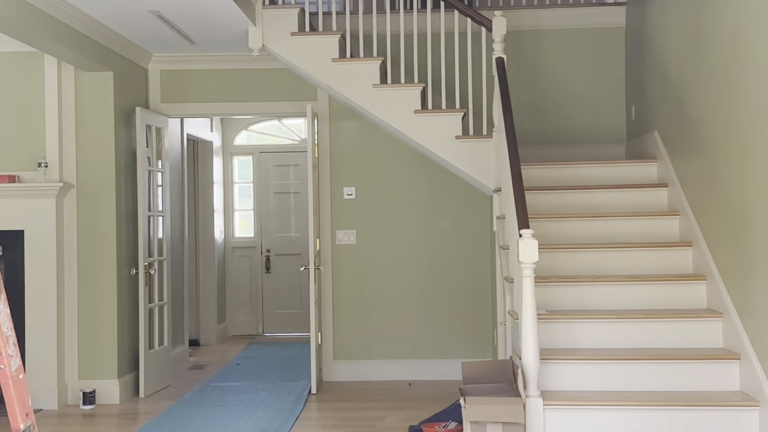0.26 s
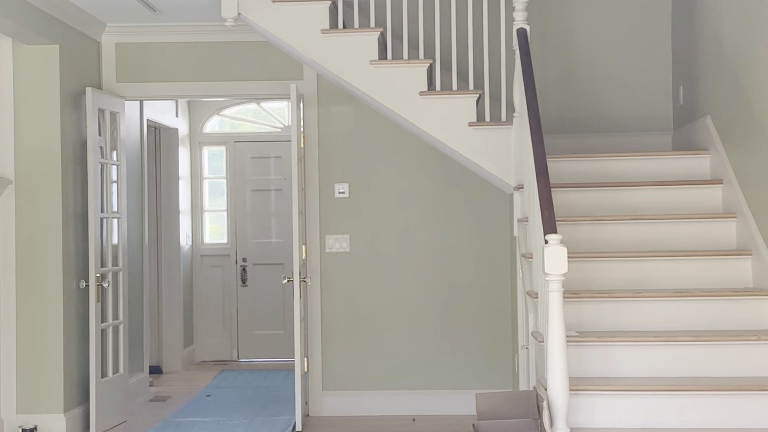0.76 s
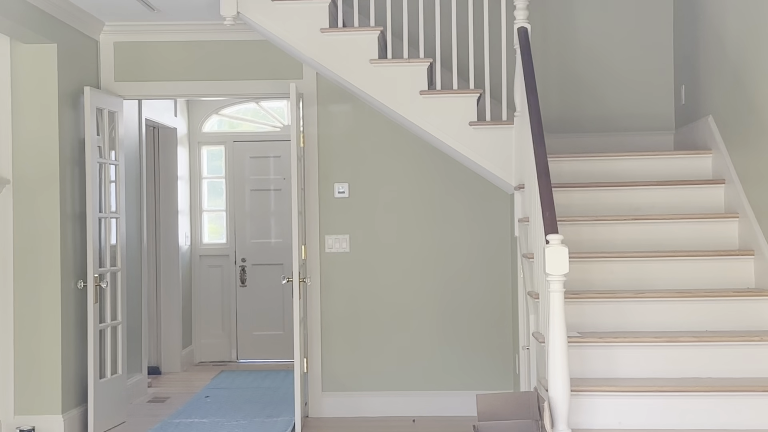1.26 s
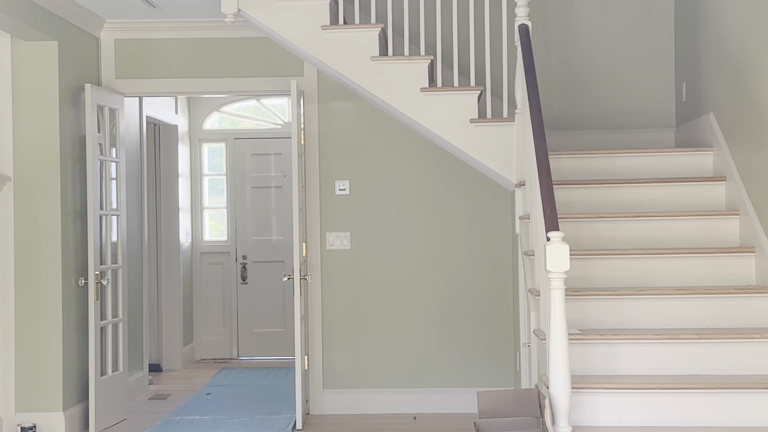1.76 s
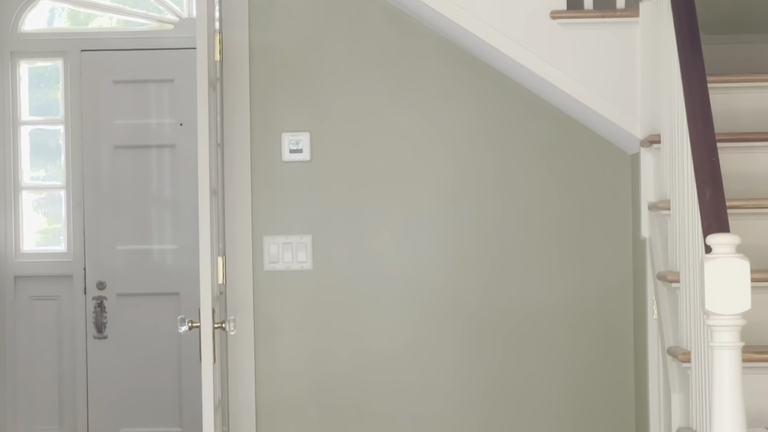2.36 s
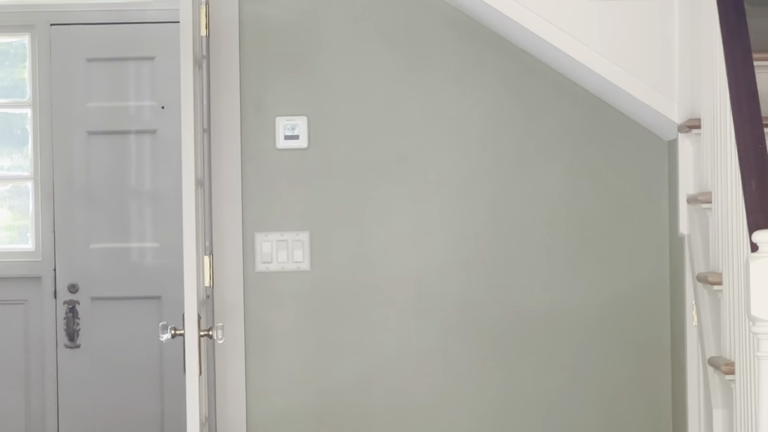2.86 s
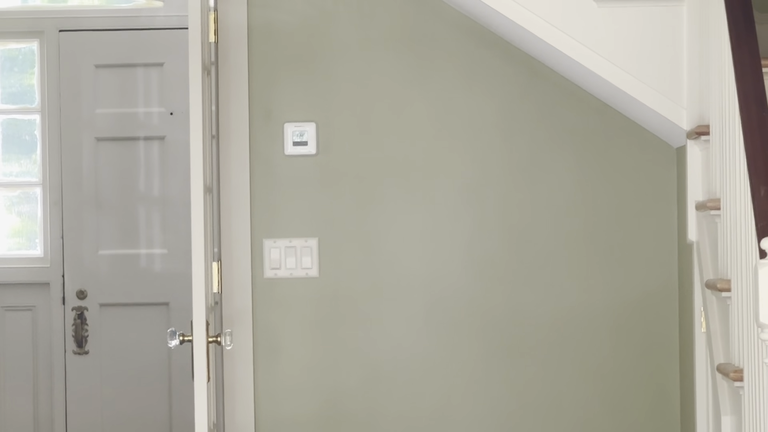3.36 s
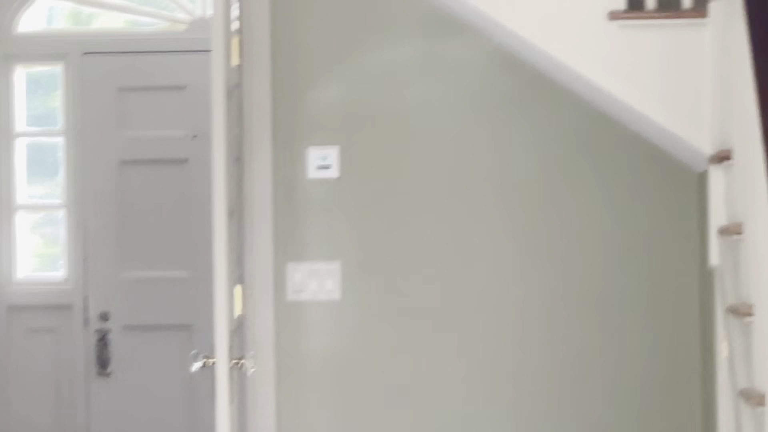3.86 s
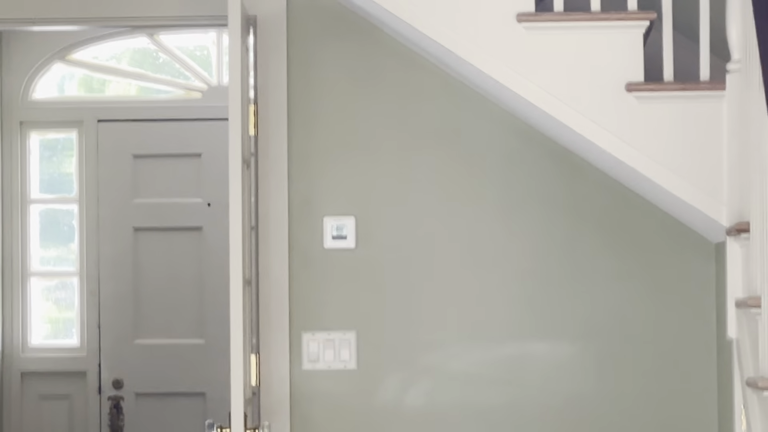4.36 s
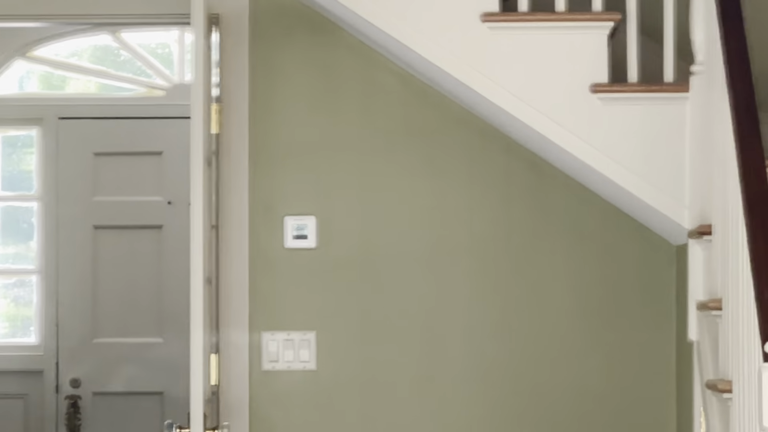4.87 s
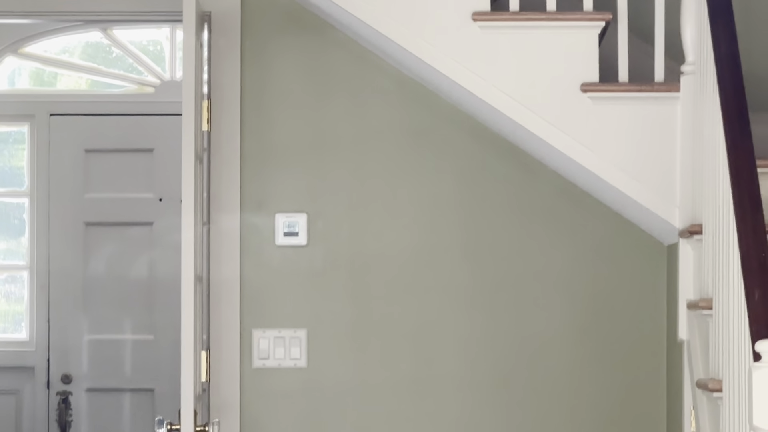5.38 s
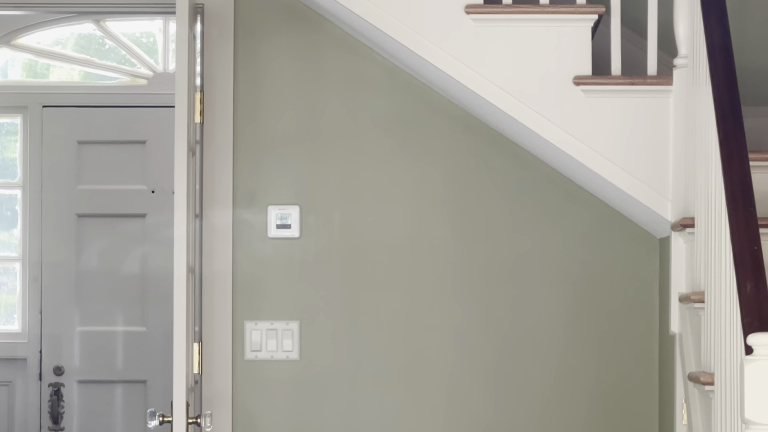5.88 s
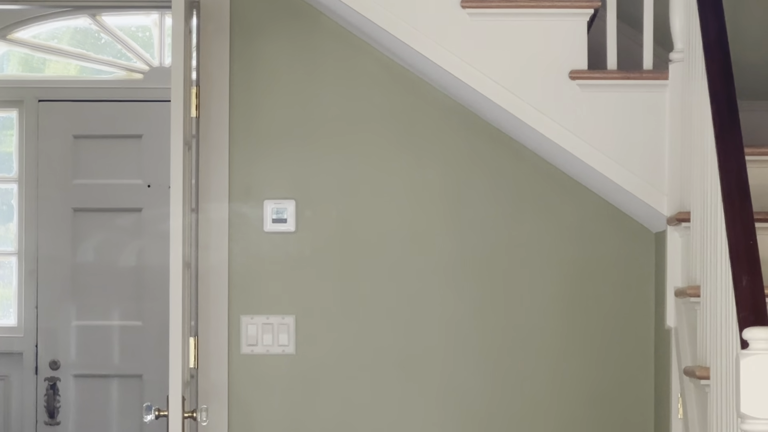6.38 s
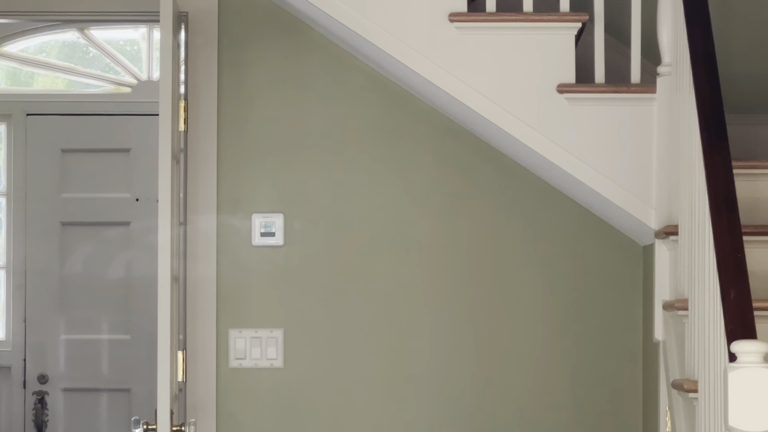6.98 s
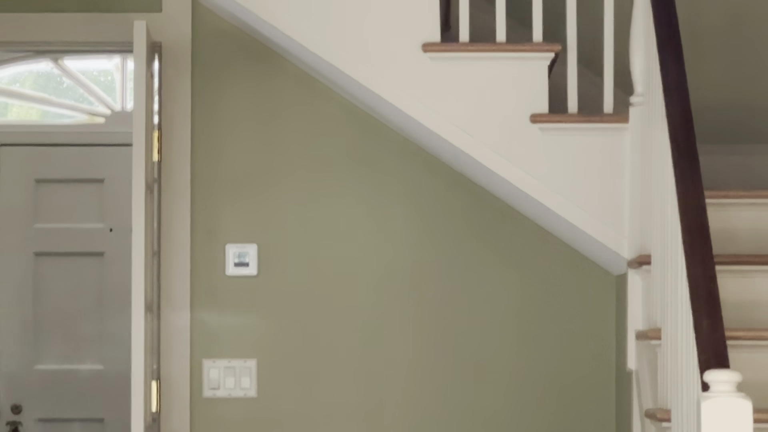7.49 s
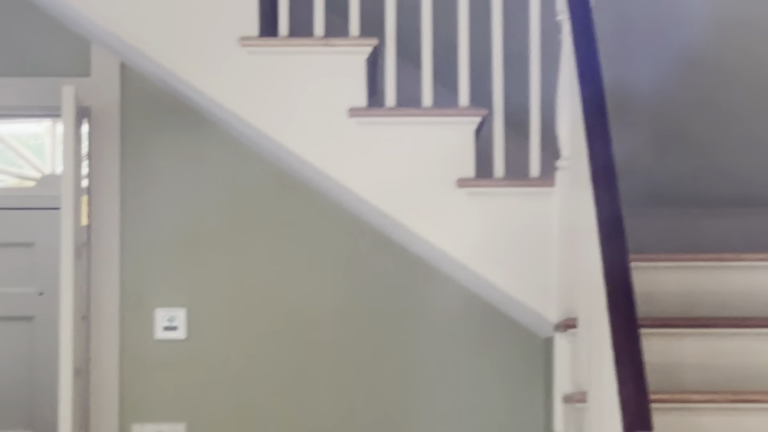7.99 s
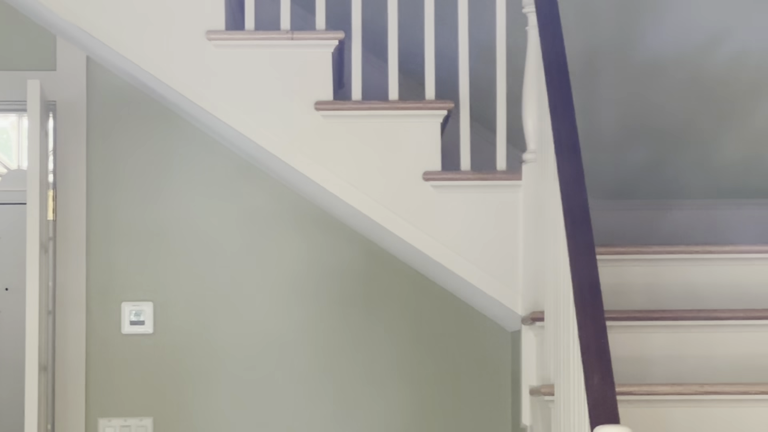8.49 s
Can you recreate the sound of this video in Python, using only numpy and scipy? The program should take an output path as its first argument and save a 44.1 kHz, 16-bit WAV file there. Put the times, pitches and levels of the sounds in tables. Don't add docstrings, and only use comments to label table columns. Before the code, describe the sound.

A hand-held phone catches a constant high insect drone, slow steps on hollow boards, and one very hard knock around the middle.

```python
import sys
import numpy as np
from scipy import signal
from scipy.fft import rfft, irfft
from scipy.io import wavfile

SR = 44100
rng = np.random.default_rng(int(sys.argv[2]) if len(sys.argv) > 2 else 0)


def invert_db(x):
    u = np.asarray(x, float) / 20
    return 10 ** u


def dump_mix(stems):
    frames = np.atleast_2d(stems).T
    limited = np.clip(frames, -1, 1)
    pcm = np.round(limited * 32767).astype(np.int16)
    wavfile.write(sys.argv[1], SR, pcm)


N = 385434

# (time [s], turned [0-1], cupped [0-1], covered [0-1])
POSE = [(0.0, 0, 0, 0.07), (1.0, 0, 0.01, 0.01), (3.04, 0, 0, 0), (3.58, .1, 0, 0.07),
        (3.82, .2, 0.1, 0.39), (4.04, .3, 0.9, 0.27), (4.23, .3, 1, .3), (4.5, .4, 0.65, 0.11),
        (4.72, .6, 0.71, 0.02), (4.89, .9, 0.32, 0), (5.5, 1, 0.02, 0), (6.6, 1, 0, 0.01),
        (7.23, 0.94, 0.06, 0), (7.5, .8, 0.43, 0), (7.64, 0.7, 0, 0.38), (7.89, 0.5, 0, 0.78),
        (8.32, .6, 0.2, 1), (8.74, .6, 0.54, 1)]

# (open level [dB], gain by turning [dB], by cupping [dB], by covering [dB])
HIGH_HEARD = (-65, 6.5, -2, -15)
LOW_HEARD = (-63, 4, -5.5, -16)
SWARMS_HEARD = [(-61, -2, -3.5, -21.5), (-65, -9.5, 4, -14), (-57.5, -4, -13, -27), (-68.5, 5, 3.5, -23.5)]
AIR_HEARD = [(-66, -1.5, 2.5, -2), (-68.5, 0.11, -0.5, -10), (-67, 1, 2.5, -7.5)]
EDGE_HEARD = (-80, -0.5, 0, -3)
# (open [dB], turning [dB], cupping [dB], covering [dB])
TICKER_HEARD = (-79, 3, -2.5, -0.5)

# (time [s], high trill [cycles], low trill [cycles])
BEAT_LEAD = [(.12, .32, -.35), (1.1, -.28, -.34), (2.4, -.4, -.26), (4., -1.1, -.18), (5.6, -1.13, -.13),
             (6.6, -.82, -.12), (8.6, -.88, -.22)]
# (time [s], frequency [Hz])
HIGH_CENTRE = [(0, 5720), (.6, 5720), (.75, 5510), (1.5, 5470), (1.9, 5565), (2.8, 5480), (3.2, 5660),
               (4.6, 5700), (7.5, 5710), (7.9, 5570), (8.3, 5380), (8.74, 5500)]
# (frequency [Hz], width [Hz])
SWARMS = [(2030, 485), (2480, 590), (2900, 543), (3530, 730)]
# (frequency [Hz], density [dB per Hz])
AIR_DULL = [(250, -14.5), (500, -3.5), (1000, -0.5), (1600, -2.5), (2200, -3), (3500, -24), (4500, -29.5)]
# (frequency [Hz], width [Hz], level [dB])
HAZE = [(4613, 1100, -5), (5400, 780, 1.5), (5660, 410, 2)]
# (frequency [Hz], width [Hz], level [dB])
BRIGHT = [(6090, 560, -0.5), (6825, 570, 2), (7560, 900, -1.5), (8434, 910, 2.5), (9660, 1400, -11),
          (10750, 950, -13.5)]
# (time [s], rumble level [dB], creak level [dB re rumble])
STIR = [(0.0, -63.5, -6), (0.4, -59, -11), (1.0, -60.5, -1.5), (2.3, -57, -2.5), (2.5, -53, -8.5),
        (3.35, -54.5, -4), (3.5, -67, 5.5), (3.8, -56.5, -7), (4.45, -71.5, 4), (4.9, -57, 1.5),
        (5.3, -59, 2), (5.45, -69, -0.5), (6.62, -68, -4.5), (6.8, -59, -10), (7.12, -55.5, -12),
        (7.5, -59, 2.5), (7.66, -69.5, 0.5), (8.74, -65, -5.5)]
# (frequency [Hz], density [dB per Hz])
RUMBLE_LOW = [(25, -10), (45, 2), (65, 3), (100, 2), (140, -16.5), (220, -27.5)]
# (frequency [Hz], density [dB per Hz])
RUMBLE_MID = [(90, -11.5), (140, 0.5), (300, -4.5), (600, -11), (900, -34.5)]
# (start [s], length [s], level [dB])
RUBS = [
    (3.55, 1.3, -68.5),
    (5.0, 0.47, -78.5),
    (.1, 0.55, -90),
    (1.5, 1.2, -95),
    (8.2, 0.505, -90),
    (6.798, 0.92, -78),
]
# (start [s], length [s], level [dB])
SWELLS = [
    (0, .25, -84),
    (.45, 0.48, -73.5),
    (1.6, .2, -82),
    (2.05, 0.76, -72.5),
    (2.898, .15, -80),
    (4.0, .85, -76),
    (5.197, 0.28, -70),
    (8.0, .25, -81),
]
# (time [s], peak level [dB], frequency [Hz])
THUDS = [(0.122, -51, 70.6), (0.202, -53, 59.2), (0.333, -49, 56), (0.955, -50, 51.7), (1.462, -52, 91),
         (2.396, -32, 62.5), (2.439, -37.5, 101), (2.464, -41, 69), (2.508, -39, 78.1), (2.62, -45, 120),
         (2.933, -42, 96), (3.028, -43, 64), (3.049, -53, 75.4), (3.248, -47, 64), (3.351, -38.5, 340),
         (3.7, -42.5, 101), (3.729, -46, 48.6), (4.726, -51, 147), (5.2, -60, 135), (5.23, -42, 398),
         (5.845, -51, 70), (5.893, -54.5, 110), (6.686, -47, 85), (6.771, -52, 98.5), (6.909, -56, 86.1),
         (7.22, -45, 100), (7.25, -45, 54.5), (7.422, -43.5, 75.4), (8.403, -50, 83.5),
         (8.473, -48.5, 70.5), (8.587, -50, 67.3), (8.631, -46, 69)]
# (time [s], peak level [dB])
SNAPS = [
    (1.8335, -56),
    (4.8812, -40),
    (5.0462, -47),
    (5.0492, -52),
    (7.222, -56),
    (7.437, -60),
]
# (time [s], peak level [dB],
# frequency [Hz])
TAPS = [(6.532, -59.5, 351), (6.562, -58, 300), (6.598, -59, 380), (6.668, -56, 190), (6.77, -57, 300),
        (6.846, -54, 300), (6.906, -49, 300), (7.214, -44.5, 700), (7.24, -51, 747), (3.36, -44, 380),
        (1.822, -52, 500), (1.882, -46, 170), (1.95, -45, 220), (2.362, -51, 250), (2.405, -46, 190),
        (2.44, -46, 200), (2.625, -51, 350), (4.9018, -18, 320), (5.782, -50, 450), (3.1822, -45, 600),
        (2.008, -50, 200)]
# (time [s], peak level [dB])
CHIRPS = [(.187, -52), (1.049, -49.5), (1.917, -52), (2.297, -48.5), (2.827, -48), (3.315, -47),
          (3.825, -56), (4.173, -52.5), (4.552, -55), (4.988, -44), (5.388, -42), (5.804, -41.5),
          (6.2, -45.5), (6.557, -46.5), (6.972, -44), (7.339, -43.5), (7.697, -52), (8.134, -61),
          (8.515, -60.5)]
# (start [s], length [s], level [dB])
GUSTS = [(1.4, 0.15, -84), (2.1, 0.24, -74), (2.274, 0.27, -62), (2.62, 0.81, -60), (2.899, 0.15, -58),
         (3.4, 0.17, -76), (3.75, 0.17, -67), (4.1, 0.16, -74), (6.54, .1, -83), (6.8, 0.095, -78.5),
         (7.1, 0.28, -83), (7.93, 0.12, -70.5)]
# (frequency [Hz], density [dB per Hz])
WIND = [(30, -6), (60, 4), (100, -4), (200, -14), (350, -33)]
# (time [s], thud level [dB], thud frequency [Hz], crack level [dB], crack frequency [Hz])
KNOCKS = [(1.8327, -35.5, 517, -29, 2055), (1.8452, -66, 258, -38, 2800), (1.9325, -70, 493, -34, 3050),
          (3.1844, -29.5, 93, -44, 1300), (4.8805, -2.5, 138.4, -14, 1230), (4.9217, -42, 198, -50, 1825),
          (5.0455, -47, 480, -29, 2280), (5.7628, -37.5, 499, -35.5, 1200), (5.7634, -63, 380, -33.5, 2940),
          (7.437, -50, 249, -39.5, 2495), (7.457, -65, 400, -38.5, 1500), (4.8803, -69.5, 402, -19, 2120),
          (5.7664, -44, 326, -39, 2900), (7.464, -65, 400, -45, 1296)]
# (time [s], level [dB], frequency [Hz], lag of 100 Hz [s])
LANDINGS = [
    (1.8321, -48, 300, .008),
    (1.8376, -29.5, 95.5, .0033),
    (1.8435, -38.5, 324, .008),
    (1.8497, -30, 69, .0033),
    (1.9314, -36, 440, .008),
    (1.935, -36, 123, .0038),
    (1.9355, -43, 57, .0047),
    (3.1952, -33.5, 74.5, .0026),
    (5.7656, -38, 121, .0044),
    (5.7785, -35, 47, .0043),
]
# (frequency [Hz], level [dB], decay by 80 dB [s])
BOARDS = [(155.4, 2.5, 0.3), (209.5, 1, 0.2), (267, 3, 0.13), (338.4, 4, 0.17), (380, -14, 0.13),
          (410, -2, 0.083), (496.4, -14, 0.12), (556, -26, 0.23), (600, -24, .15), (727, -22, 0.2),
          (834, -25, 0.2)]
# (frequency [Hz], width [Hz], share added [ratio])
PLANK = [(340, 400, 0.53), (756, 130, 0.6), (1053, 240, -0.75), (1896, 440, 0.1), (2860, 920, 0.7)]
# (start [s], length [s], level [dB], grit share [dB], drag share [dB])
SCUFFS = [(3.189, 0.068, -45.5, -7, -11.5), (3.342, 0.052, -52, -7.5, -6.5),
          (3.474, 0.019, -53.5, -2.5, -5), (3.583, .04, -58, -4, -8), (3.634, 0.041, -54, -6, -5.5),
          (3.694, 0.048, -54, 0.5, -1), (3.844, .04, -67, 3.5, -7.5), (4.099, 0.042, -62.5, -4.5, -4.5),
          (4.178, .04, -57.5, -8, -17), (4.55, 0.19, -66.5, 0, -8), (4.793, 0.12, -57, -2, -4),
          (5.066, 0.012, -57, -2, -1.5), (5.11, .034, -59, -2.5, -6.5), (7.221, 0.01, -48.5, -7.5, -4.5),
          (7.261, .04, -62.5, -11, -1), (7.433, 0.027, -57, -1.5, -1), (7.502, 0.052, -63.5, -0.5, -8),
          (7.556, 0.043, -55, -9.5, -13.5)]
# (frequency [Hz], width [Hz], level [dB])
DRAG = [(372.5, 264, 9.5), (581.3, 680, 1), (1247, 1030, 0.5)]
# (frequency [Hz], width [Hz], level [dB])
SOLE = [(2036, 790, 2.5), (2790, 530, 4.5), (3730, 2280, -4)]
# (frequency [Hz], width [Hz], level [dB])
GRIT = [(4810, 910, 1), (5920, 1420, 2.5), (8470, 5200, -1.5), (11800, 3400, -6)]
# (start [s], length [s], first frequency [Hz], last frequency [Hz], level [dB])
HAND_GAPS = [(7.7, .16, 2800, 2750, -73), (7.68, .25, 2600, 2450, -72), (7.57, .08, 4800, 4700, -64.5),
             (4.4, .4, 2450, 2500, -58.5), (7.545, 0.083, 2500, 2400, -54), (7.545, .1, 3800, 3400, -59.5),
             (7.222, 0.04, 3000, 2850, -50.5), (7.22, 0.031, 4200, 4100, -53.5),
             (3.34, 0.09, 2600, 2200, -53.5), (3.2, 0.055, 2850, 2700, -46),
             (3.25, 0.0197, 2700, 2600, -44), (3.48, .035, 4600, 4500, -62), (3.48, .035, 4050, 3950, -63),
             (3.94, 0.065, 2100, 1900, -66), (4.0, .1, 2700, 2550, -68), (7.68, .1, 1900, 1850, -72),
             (4.17, .22, 2550, 2450, -63.5), (3.64, 0.037, 2900, 3100, -57),
             (7.225, 0.026, 1950, 1850, -56), (4.5, 0.27, 3600, 3500, -65)]
# (frequency [Hz], level [dB re floor])
UNSHARED = [(40, -42), (110, -28.5), (300, -12), (700, -5), (1400, -6.5), (1900, -22), (6200, -57.5),
            (7200, -14.5), (10300, -8.5), (11400, -9.5)]
# (frequency [Hz], lead of right over left [half turns each side])
PORT_TURNS = [(4100, 0), (4500, .055), (4800, .16), (4900, .27), (4970, .5), (5050, .75), (5200, .91),
              (5500, 1), (6300, 1), (7000, 1.1), (10000, 1.33), (11200, 1.5), (14100, 1.5), (14800, 1.72)]

HIGH_PER_S, LOW_PER_S = 70.7, 67.2
KNOCK_SPREAD_S = 0.00799


def rms_one(x):
    return x / np.sqrt(np.mean(x ** 2) + 1e-20)


def in_time(rows):
    s, *columns = np.transpose(rows)
    return [np.interp(np.arange(N) / SR, s, c) for c in columns]


def at_hz(points, hz):
    f, v = np.transpose(points)
    return np.interp(np.log(hz + 1), np.log(f), v, left=v[0] - 20, right=v[-1] - 20)


def drift(rate):
    r = np.exp(-80 * np.pi * rate / SR)
    slow = signal.lfilter([1], [1, -2 * r, r * r], rng.standard_normal(N // 40 + 2002))[2000:]
    return np.interp(np.arange(N) / 40, np.arange(len(slow)), rms_one(slow - slow.mean()))


def coloured(points):
    hz = np.fft.rfftfreq(N, 1 / SR)
    return rms_one(irfft(rfft(rng.standard_normal(N)) * invert_db(at_hz(points, hz)), N))


def resonate(x, hz, width):
    r = np.exp(-np.pi * width / SR)
    b = (1 - r * r) / 2 * np.array([1, 0, -1])
    a = [1, -2 * r * np.cos(2 * np.pi * hz / SR), r * r]
    return signal.lfilter(b, a, signal.lfilter(b, a, x))


def through(x, peaks):
    return rms_one(sum((-1) ** k * invert_db(db) * resonate(x, hz, w) for k, (hz, w, db) in enumerate(peaks)))


def add(out, s, sound):
    i = round(s * SR)
    out[i:i + len(sound)] += sound[:N - i]


def bending_wave(hz, q, spread, edge=3.27, power=.8, size=16384):
    f = np.fft.rfftfreq(size, 1 / SR)
    band = 1j * f / hz / q / (1 - (f / hz) ** 2 + 1j * f / hz / q)
    late = np.exp(-2j * np.pi * spread * 100 ** power * f ** (1 - power) / (1 - power))
    wave = irfft(band ** 2 / (1 + (f / hz / edge) ** 6) * late, size)[:size // 2]
    return wave / np.max(np.abs(wave))


def heard(row):
    return row[0] + np.dot(row[1:], in_time(POSE))


def trill(hz, level_db, per_s, lead, duty, fall_hz, waver_hz, uneven_db, echo_db):
    stroke = (per_s * np.arange(N) / SR + lead + duty / 2) % 1 / duty
    stroke = np.minimum(stroke, 1)
    pitch = hz + fall_hz * (.5 - stroke) + waver_hz * drift(60)
    tone = np.sin(2 * np.pi * np.cumsum(pitch) / SR)
    voice = tone * np.sin(np.pi * stroke) ** 2 * invert_db(uneven_db * drift(30))
    echo = invert_db(echo_db) * np.roll(voice, round(0.0099 * SR))
    return invert_db(level_db + .7 * drift(0.99)) * rms_one(voice + echo)


def crickets():
    (high_lead, low_lead), turned = in_time(BEAT_LEAD), in_time(POSE)[0]
    high = trill(in_time(HIGH_CENTRE)[0], heard(HIGH_HEARD), HIGH_PER_S, high_lead, .54, 350, 18, .6, -18)
    low_hz = 5274 - 89.5 * turned
    low = trill(low_hz, heard(LOW_HEARD), LOW_PER_S, low_lead, .57, 380, 20, 1.3, -14)
    edge = trill(5920, heard(EDGE_HEARD), HIGH_PER_S, high_lead + .1, .4, 200, 18, .6, -18)
    return high + low + edge


def chorus():
    out = np.zeros(N)
    for row, (hz, width) in zip(SWARMS_HEARD, SWARMS):
        band = rms_one(resonate(rng.standard_normal(N), hz, width))
        out += invert_db(heard(row) + 0.77 * drift(20)) * band
    return out


def air():
    dull_db, haze_db, bright_db = map(heard, AIR_HEARD)
    dull = coloured(AIR_DULL) * invert_db(dull_db + 2.0)
    haze = through(rng.standard_normal(N), HAZE) * invert_db(haze_db + 6.0)
    bright = through(rng.standard_normal(N), BRIGHT) * invert_db(bright_db + 1.3 * drift(26) + 0.76 * drift(2.7))
    return dull + haze + bright


def rumble():
    low_db, creak_db = in_time(STIR)
    lumps = .7 * drift(3.5)
    low = invert_db(2.1 * lumps) * coloured(RUMBLE_LOW)
    creak = invert_db(creak_db + 2.0 * lumps + 1.5 * drift(25)) * coloured(RUMBLE_MID)
    return invert_db(low_db) * (low + creak)


def ticker():
    ticks_per_s = 50 * (1 + 0.047 * drift(4))
    beat = np.cos(2 * np.pi * np.cumsum(ticks_per_s) / SR)
    rasp = resonate(rng.standard_normal(N) * np.maximum(beat, 0) ** 4, 7920, 1100)
    return invert_db(heard(TICKER_HEARD) + 2.7 * drift(2.5)) * rms_one(rasp)


def top_air():
    band = signal.butter(3, [11300, 17000], "band", fs=SR, output="sos")
    t = np.arange(N) / SR
    rub = sum(invert_db(db) * np.clip(np.minimum(t - s, s + length - t) / .08, 0, 1) for s, length, db in RUBS)
    hiss = rms_one(signal.sosfilt(band, rng.standard_normal(N)))
    return (invert_db(-101) + rub) * invert_db(1.5 * drift(6)) * hiss


def swells():
    t = np.arange(N) / SR
    level = sum(invert_db(db) * np.clip(np.minimum(t - s, s + length - t) / .06, 0, 1) for s, length, db in SWELLS)
    return level * rms_one(resonate(rng.standard_normal(N), 9900, 2600))


def thuds():
    out = np.zeros(N)
    for s, db, hz in THUDS:
        add(out, s, invert_db(db - 1.5) * bending_wave(hz, 2.0, 0.00313))
    for s, db in SNAPS:
        add(out, s, invert_db(db) * bending_wave(10500, .6, .002, edge=2.2))
    for s, db, hz in TAPS:
        add(out, s, invert_db(db) * bending_wave(hz, 0.92, KNOCK_SPREAD_S, edge=1.5))
    return out


def chirps():
    length_s, stroke_s = .024, .04
    out, turned = np.zeros(N), in_time(POSE)[0]
    u = np.arange(round(length_s * SR)) / (length_s * SR)
    hz = 5130 - 760 * u ** 2.3
    off_wing = 1 - np.exp(-((hz - 5070) / 120) ** 2)
    tone = np.sin(2 * np.pi * np.cumsum(hz) / SR)
    for s, db in CHIRPS:
        stroke = tone * np.sin(np.pi * u) ** .7 * invert_db(-8 * off_wing * .5 * turned[round(s * SR)])
        for k, swell_db in enumerate([-3.5, -.5, .5]):
            add(out, s + k * stroke_s + .002, invert_db(db + swell_db + rng.normal(0, 0.6)) * stroke)
    echo = invert_db(-14) * np.roll(out, round(.011 * SR))
    return (out + echo) * invert_db(-1.5 + 1.2 * drift(150))


def wind():
    t = np.arange(N) / SR
    gusts = sum(invert_db(db) * np.sin(np.pi * np.clip((t - s) / length, 0, 1)) for s, length, db in GUSTS)
    return gusts * invert_db(3.5 * drift(13)) * coloured(WIND)


def deck_ring(t):
    ring = np.zeros(len(t))
    for hz, db, t80 in BOARDS:
        level_chance, phase_chance = rng.normal(0, 1, 2)
        decay = invert_db(db - 1.5 + 1.3 * level_chance - 80 * t / t80)
        ring += decay * np.sin(2 * np.pi * hz * t + 3 * phase_chance)
    upper = resonate(rng.standard_normal(len(t)), 600, 400)
    joists = resonate(resonate(rng.standard_normal(len(t)), 249, 350), 249, 350)
    ring = ring + upper * invert_db(-22 - 60 * t / 0.12) + joists * invert_db(14 - 60 * t / 0.14)
    return ring * (1 - np.exp(-(t / 0.017) ** 4))


def wood_crack(t, db, hz, spread):
    lowpass = signal.butter(4, 3050, fs=SR, output="sos")
    crack = signal.sosfilt(lowpass, bending_wave(hz, 1.5, spread, edge=min(1.5, 2900 / hz)))
    tick = invert_db(-31 - .55 * db) * bending_wave(6300, 1.1, spread, edge=2.2)
    patter = rng.standard_normal(len(t)) * invert_db(-9.5 - 60 * t / 0.031)
    return invert_db(db) * (crack + tick + resonate(patter, hz, 1900))


def knocks():
    out, t = np.zeros(N), np.arange(8192) / SR
    blows = [(*row, KNOCK_SPREAD_S) for row in KNOCKS]
    blows += [(s, db, hz, -99, 1500, lag) for s, db, hz, lag in LANDINGS]
    for s, thud_db, hz, crack_db, crack_hz, spread in blows:
        ring = invert_db(-15.0 + .3 * thud_db) * deck_ring(t)
        thud = invert_db(thud_db) * (ring - bending_wave(hz, 0.87, spread))
        add(out, s, thud + wood_crack(t, crack_db, crack_hz, spread))
    return out + sum(share * resonate(out + 1e-18, hz, width) for hz, width, share in PLANK)


def scuffs():
    grip_s, lift_db_per_s = .007, 280
    sizes = invert_db(2.2 * np.minimum(rng.exponential(1, N), 3.5))
    struck = rng.random(N) < 5000 / SR
    grains = rng.standard_normal((3, N)) * sizes * struck
    sole, grit, drag = through(grains[0], SOLE), through(grains[1], GRIT), through(grains[2], DRAG)
    out, t = np.zeros(N), np.arange(N) / SR
    for s, length, level_db, grit_db, drag_db in SCUFFS:
        near = slice(round((s - grip_s) * SR), round((s + length + .3) * SR))
        onset = np.clip((t[near] - s) / grip_s + 1, 0, 1)
        sliding = onset * invert_db(level_db - lift_db_per_s * np.maximum(t[near] - s - length, 0))
        out[near] += sliding * (sole[near] + invert_db(grit_db + 2.5) * grit[near] + invert_db(drag_db) * drag[near])
    return out * invert_db(0.5 * drift(41.8))


def hand_gaps():
    out = np.zeros(N)
    lowpass = signal.butter(2, 150, fs=SR, output="sos")
    for s, length, from_hz, to_hz, db in HAND_GAPS:
        u = np.linspace(0, 1, round(length * SR))
        slow = signal.sosfilt(lowpass, rng.standard_normal((2, len(u))))
        turn = 2 * np.pi * np.cumsum(to_hz + (from_hz - to_hz) * (1 - u) ** 2) / SR
        band = rms_one(slow[0] * np.cos(turn) + slow[1] * np.sin(turn))
        add(out, s, invert_db(db) * np.sin(np.pi * u) ** .5 * band)
    return out


def decorrelated(floor):
    hz = np.fft.rfftfreq(N, 1 / SR)
    scramble = np.exp(2j * np.pi * np.cumsum(rng.normal(.02, 0.038, len(hz)) * SR / N))
    return irfft(rfft(floor) * invert_db(at_hz(UNSHARED, hz)) / scramble, N)


def scene():
    insects = crickets() + chorus() + ticker() + swells() + chirps()
    floor = air() + rumble() + scuffs()
    blows = thuds() + knocks()
    lean = invert_db(-17.0) * resonate(blows, 230, 420) + invert_db(-15.5) * resonate(blows, 1100, 900)
    alike = insects + floor + blows + top_air() + hand_gaps()
    opposite = decorrelated(floor) + wind() - lean
    return alike + opposite * [[1], [-1]]


def band_limit(x):
    return signal.sosfilt(signal.butter(12, 16810, fs=SR, output="sos"), x)


def record(dry):
    bass_cut = signal.butter(3, 40, "high", fs=SR, output="sos")
    treble_cut = signal.cheby2(10, 60, 16700, fs=SR, output="sos")
    dry = signal.sosfilt(treble_cut, signal.sosfilt(bass_cut, dry))
    turns = np.interp(np.fft.rfftfreq(N, 1 / SR), *np.transpose(PORT_TURNS))
    twisted = irfft(rfft(dry) * np.exp(1j * np.pi * turns * np.array([[-1], [1]])), N)
    return band_limit(twisted)


dry = scene()
out = record(dry)
dump_mix(out)
```